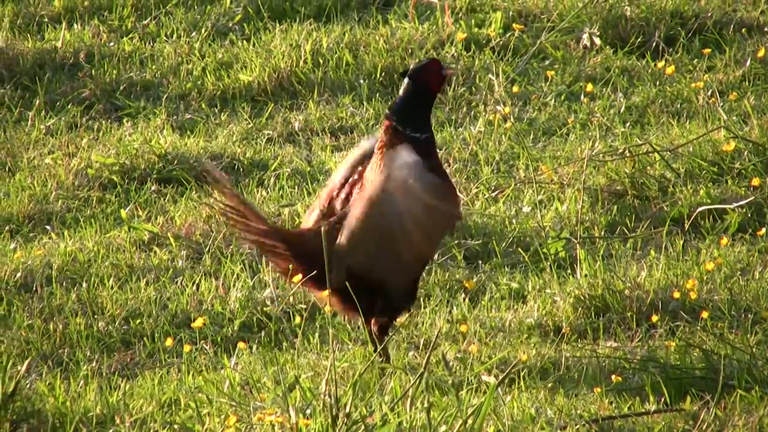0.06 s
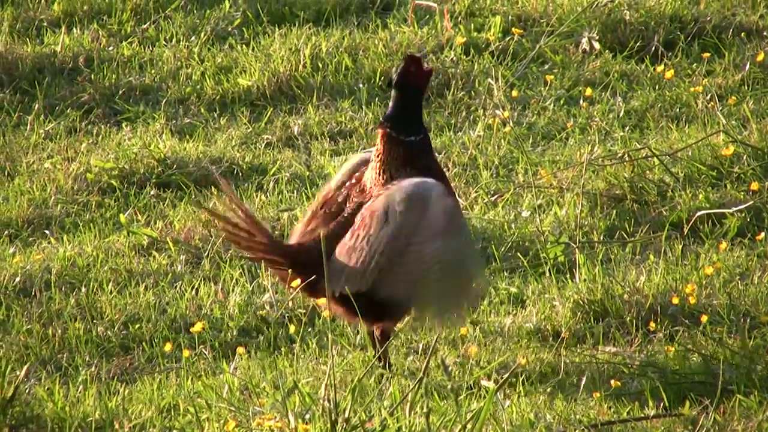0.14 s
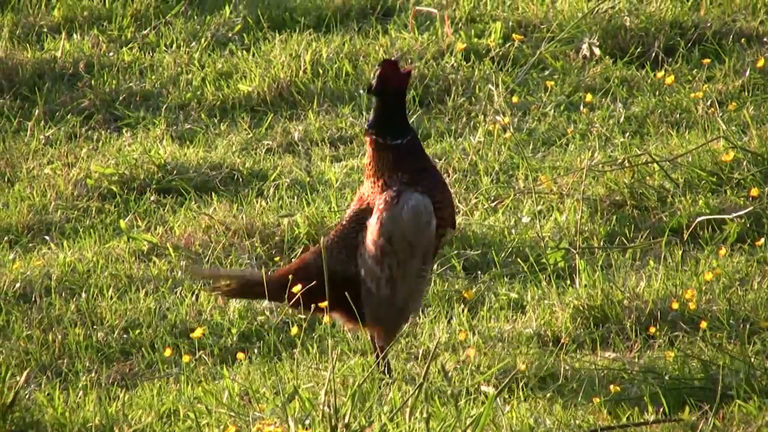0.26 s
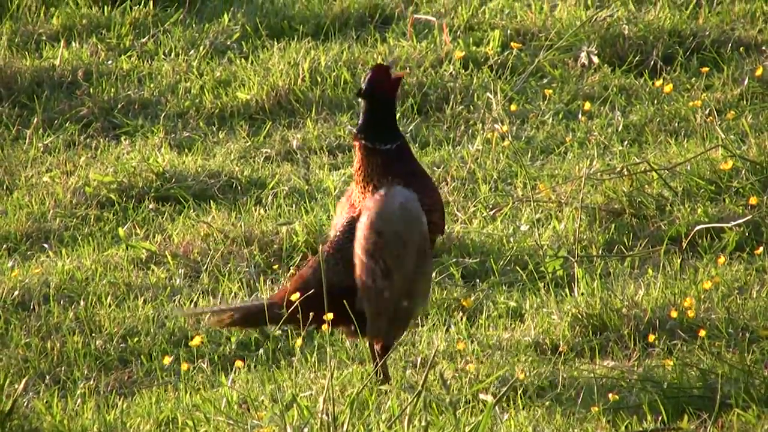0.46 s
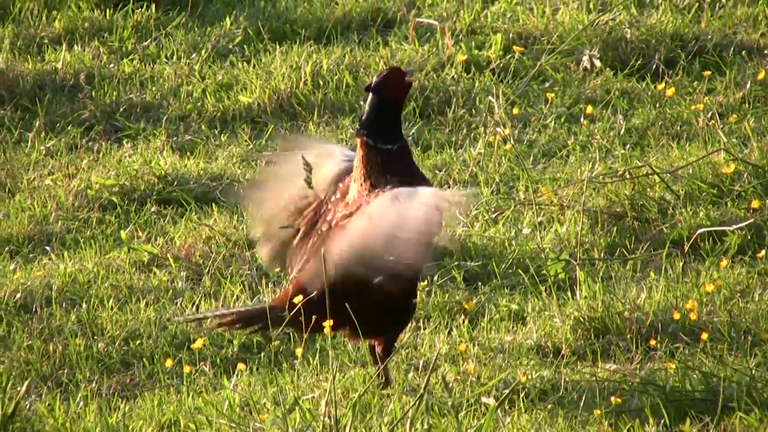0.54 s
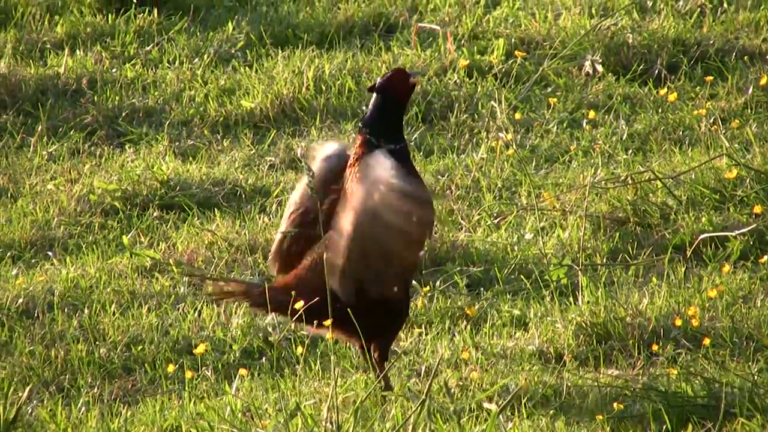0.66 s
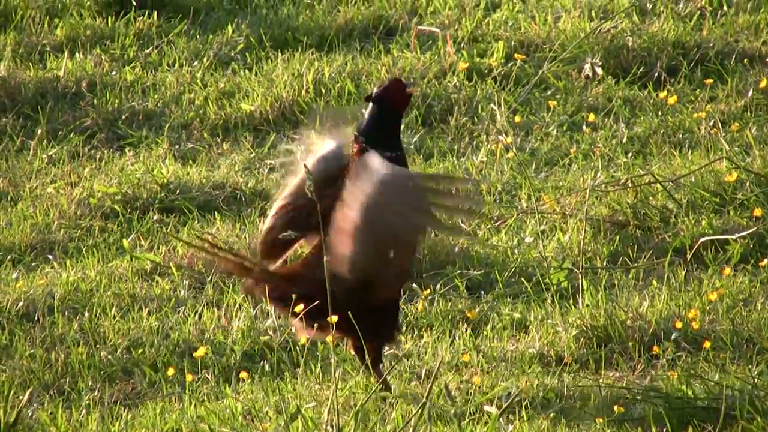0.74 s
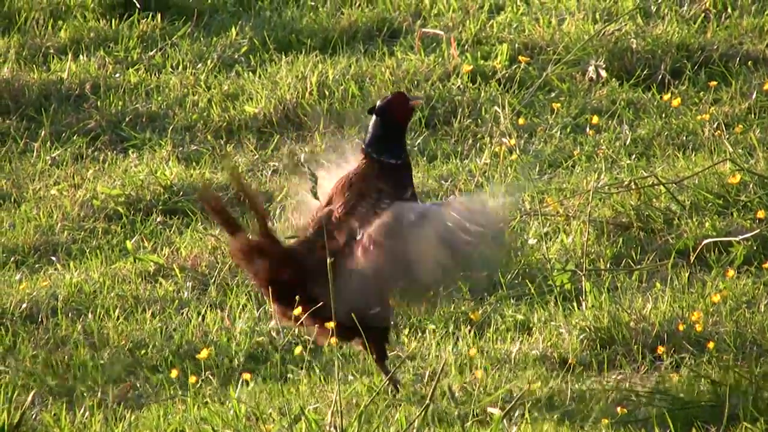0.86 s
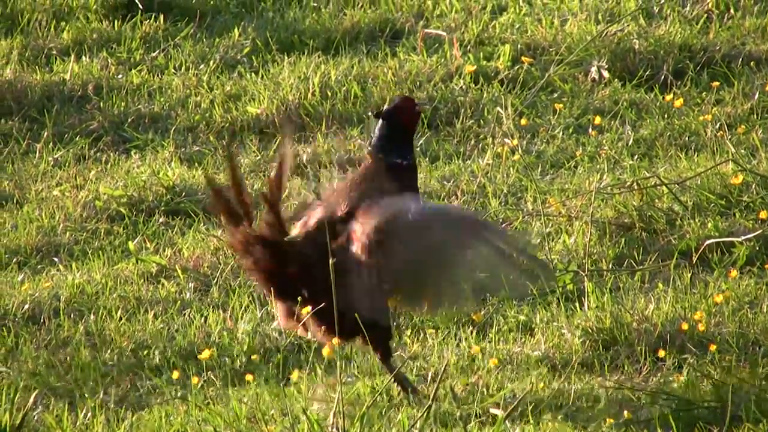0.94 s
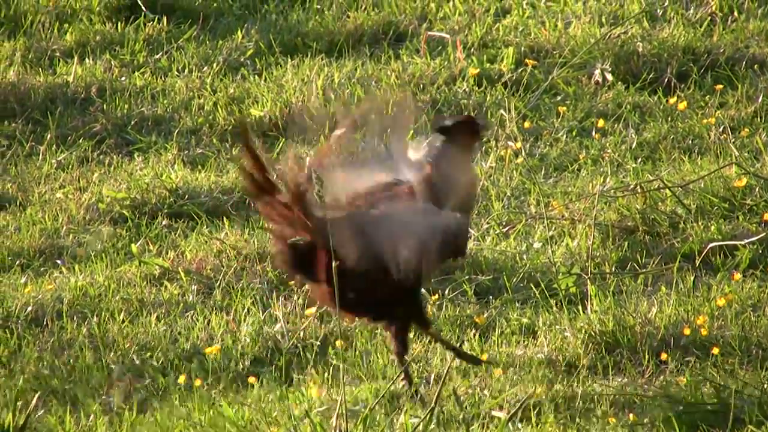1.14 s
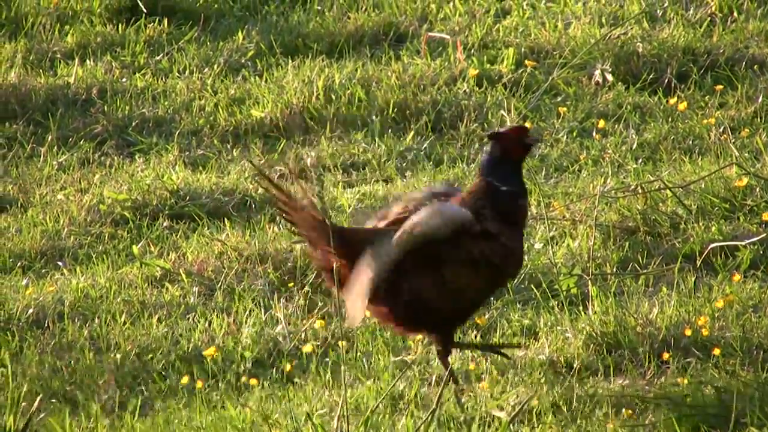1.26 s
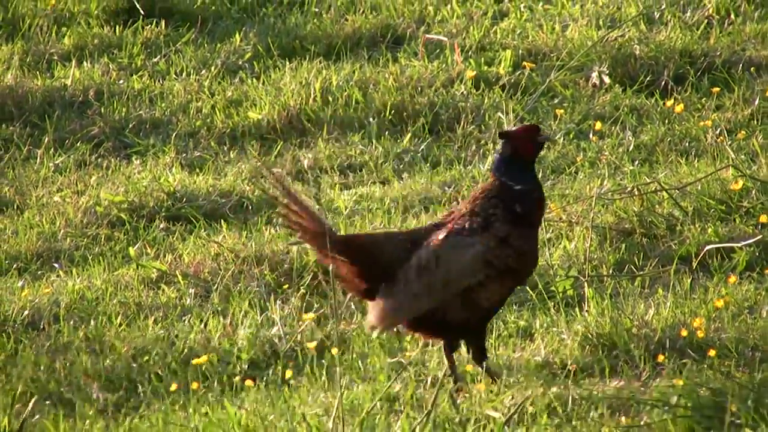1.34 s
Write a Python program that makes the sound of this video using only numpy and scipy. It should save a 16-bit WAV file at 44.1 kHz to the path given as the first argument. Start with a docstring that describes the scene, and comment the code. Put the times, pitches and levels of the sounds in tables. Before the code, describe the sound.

A pheasant crows loudly in an open meadow. After one soft wingbeat at 0.1 seconds come two harsh, rasping syllables, from 0.2 to 0.45 and from 0.5 to 0.75 seconds, with a short echo. From 0.8 to 1.3 seconds its wings drum about seven quick, quieter beats, swishing and thumping with small feather snaps. A faint distant rumble and barely audible insects lie underneath.

```python
"""One soft wingbeat, then a cock pheasant crows two harsh syllables and drums a quick burst with its wings.
The voice is a whistle that breaks into chaotic pulses ringing the windpipe; grass scatters it and the
meadow's edge throws it back. The wings swish, thump and snap their feathers.
Far rumble, insects and a thin distant bird note lie underneath."""
import sys
import numpy as np
from scipy import signal
from scipy.fft import rfft, irfft
from scipy.io import wavfile
from scipy.ndimage import uniform_filter1d

SR = 44100
rng = np.random.default_rng(int(sys.argv[2]) if len(sys.argv) > 2 else 0)


def unload_wav(signal):
    """Save mono or channel-first audio to the path in sys.argv[1] as 16-bit WAV at rate SR, clipped to [-1, 1]."""
    wavfile.write(
        sys.argv[1],
        SR,
        np.round(np.clip(np.atleast_2d(signal).T, -1, 1) * 32767).astype(np.int16),
    )


N = 61739
TIME_S = np.arange(N) / SR

# per syllable: t/s, pitch/Hz, tone/dB, low rasp/dB, high rasp/dB, main resonance/Hz, its level/dB
SYLLABLES = [
    [(0.218, 1076, -52, -52, -68, 4090, -59), (0.224, 1069, -35, -35, -51, 3880, -47),
     (0.23, 1116, -25.5, -31, -29.5, 4030, -27), (0.248, 1193, -21.5, -30, -23, 4060, -24.5),
     (0.252, 1163, -20.5, -21, -21, 4090, -23), (0.282, 1167, -19.5, -26, -22, 4072, -24.5),
     (0.3, 1217, -19, -25, -19, 4050, -24), (0.346, 1160, -17.5, -27.5, -23, 4072, -26),
     (0.414, 1132, -16.5, -26, -26.5, 4022, -31.5), (0.436, 1120, -17, -67, -39, 3924, -35),
     (0.448, 1236, -51, -52, -23, 4090, -40)],
    [(0.512, 1161, -62, -46, -46, 4220, -40), (0.524, 1119, -17, -30.5, -30, 4126, -33.5),
     (0.542, 1127, -11, -22.5, -22, 4040, -28), (0.552, 1136, -16, -24, -24, 4117, -33),
     (0.562, 1327, -24.5, -38.5, -23.5, 4140, -25.5), (0.588, 1183, -19.5, -30.5, -24.5, 4154, -35),
     (0.602, 1151, -18.5, -32.5, -30, 4076, -36.5), (0.636, 1126, -16.5, -35.5, -33, 4007, -35),
     (0.684, 1091, -21, -42, -41.5, 4184, -44), (0.72, 1095, -34, -49, -55, 4190, -43),
     (0.745, 1127, -62, -57, -55, 4310, -50)],
]
# chaotic shares: t/s, of the tone/0-1, of the pulses/0-1
CHAOS = [(.22, 0.77, 0.98), (.335, 0.77, 1), (.355, 0.6, 0.82), (0.399, 0.14, 0.94), (0.419, 0, 1),
         (.52, 0, 0.67), (0.548, 0.02, 0.5), (.56, 0.98, 0.3), (0.581, 0.3, 0.8), (0.599, 0, 0.9),
         (.64, 0.01, 0.63), (.74, 0, 1)]
def syllable(rows, ramp_s=0.004, hiss_rise_s=0.074, pipe_rest_hz=4090):
    """A whistle breaks into pulses, uneven or steady at a third of its pitch, that ring the windpipe."""
    start_s, end_s = rows[0][0], rows[-1][0]
    hz, tone_db, low_db, high_db, pipe_hz, pipe_db = tracks(rows)
    tone_chaos, pulse_chaos = tracks(CHAOS)
    phase = 2 * np.pi * np.cumsum(hz) / SR
    whistle = np.sin(phase) + amp(-30.5) * np.sin(2 * phase) - amp(-22) * np.sin(3 * phase)
    whistle *= np.sqrt(2) * (1 + 0.05 * drift(150))
    cycles = np.cumsum(hz * np.abs(1 + 0.6 * drift(30))) / SR
    uneven = np.diff(np.floor(cycles), prepend=0)  # one pulse per jittered cycle
    uneven = unit_rms(uneven * amp(0.5 * rng.standard_normal(N)))
    steady = unit_rms(sum(np.cos(k * phase / 3) for k in range(2, 30)))
    pulses = np.sqrt(pulse_chaos) * uneven + np.sqrt(1 - pulse_chaos) * steady
    rough = levelled(resonate(uneven, hz, width_hz=150), 350)
    tone = np.sqrt(1 - tone_chaos) * whistle + np.sqrt(tone_chaos) * rough
    low, high, hiss = (windpipe(modes, pulses, pipe_hz / pipe_rest_hz)
                       for modes in (LOW_MODES, HIGH_MODES, HISS_MODES))
    high += hiss * np.clip((TIME_S - start_s) / hiss_rise_s, 0, 1)
    rasp = amp(low_db) * levelled(low, 600) + amp(high_db) * levelled(high, 600)
    ring = levelled(resonate(uneven, pipe_hz, width_hz=45), 400)
    gate = np.clip(np.minimum(TIME_S - start_s, end_s - TIME_S) / ramp_s, 0, 1)
    return gate * (amp(tone_db) * tone + amp(pipe_db) * ring + rasp)


# windpipe resonances at rest: f/Hz, width/Hz, relative level/dB
LOW_MODES = [(760, 41, -6), (1477, 290, 0.5), (1910, 290, 7.5), (2135, 410, -4.5), (2480, 300, -24)]
HIGH_MODES = [(2856, 420, -12.5), (3346, 260, -11.5), (3754, 167, -1), (4450, 300, -15), (4880, 207, -6),
              (5460, 360, -6), (6390, 450, -14), (6970, 360, -8), (7840, 870, -18)]
HISS_MODES = [(9740, 1660, -17), (12300, 1500, -31)]
def windpipe(modes, pulses, tuning, wander=0.013):
    """Pulses ring a row of resonances, each wavering as the neck works."""
    out = 0
    for k, (hz, width_hz, db) in enumerate(modes):
        waver = 1 + wander * unit_rms(uniform_filter1d(drift(700), 700))
        ring = resonate(pulses, hz * tuning * waver, width_hz)
        out += (-1) ** k * amp(db) * levelled(ring, 400, share=0.2)
    return out


# ring as the beak closes: t/s, f/Hz, level/dB
BEAK_RING = [(0.69, 3724, -53), (0.712, 3650, -33.5), (0.746, 3550, -51), (0.76, 3780, -49)]
# undertone and other half of the voice box, per syllable: t/s, f/Hz, level/dB
UNDERTONE = [
    [(0.222, 937.6, -41), (0.266, 864, -33), (0.338, 890, -41), (0.348, 863, -43), (0.376, 964, -42),
     (0.43, 920, -35)],
    [(0.525, 970, -64), (0.527, 985, -52), (0.539, 1000, -37), (0.589, 871.9, -36.5), (0.63, 940, -54)],
]
UPPER_VOICE = [
    [(0.222, 2760, -56), (0.23, 2800, -35), (0.268, 2853, -31), (0.344, 2865, -31), (0.35, 3030, -30.5),
     (0.418, 2954, -38), (0.44, 3030, -50)],
    [(0.52, 3024, -38), (0.526, 2987, -37), (0.546, 3058, -29), (0.566, 2828, -30), (0.588, 2937, -28),
     (0.62, 3286, -48)],
]
def crow(limit_over_rms=2.4):
    """Both syllables with their side tones, soft-limited: the membranes can swing only so far."""
    voice = sum(syllable(rows) for rows in SYLLABLES) + wavering_tone(BEAK_RING, width_hz=40)
    voice += sum(wavering_tone(rows, width_hz=50) for rows in UNDERTONE)
    voice += wavering_tone(UPPER_VOICE[0], width_hz=110, octave_db=-9)
    voice += wavering_tone(UPPER_VOICE[1], width_hz=25, octave_db=-4)
    swing = limit_over_rms * np.sqrt(uniform_filter1d(voice ** 2, 1500) + 1e-10)
    return swing * np.tanh(voice / swing)


# downstrokes: t/s, swish/dB, thump/dB, push f/Hz
DOWNSTROKES = [(0.083, -45, -50.5, 108.5), (0.818, -44.5, -38, 148), (0.884, -36.5, -35.5, 119),
               (0.954, -33.5, -32, 128), (1.028, -35.5, -33, 96), (1.1, -35.5, -31.5, 129),
               (1.169, -37, -34, 130), (1.236, -39, -38, 115)]
# wing noise spectra: f/Hz, relative level/dB
SWISH_SPECTRUM = [(260, -17), (450, -1), (1460, -1.5), (2320, -13), (2840, -11), (4430, -19), (5040, -22),
                  (9490, -21.5), (14000, -44)]
THUMP_SPECTRUM = [(18, -46), (30, -18), (83, -4), (135, 0.5), (194, -2), (256, -4.5), (536, -22),
                  (600, -37), (780, -48), (1320, -120)]
def wings(rise_s=0.0028, fall_s=0.0086, up_lead_s=0.0328, wing_lag_s=0.013, thump_s=0.02):
    """A weak upstroke, then the downstroke: a feathery swish from each wing and a low push of air."""
    swish = thump = push = 0
    for at_s, swish_db, thump_db, hz in DOWNSTROKES:
        for lag_s, db in ((0, 0), (wing_lag_s, -4), (-up_lead_s, -8.5)):
            age = TIME_S - at_s - lag_s
            swish += amp(swish_db + db) * np.exp(np.where(age < 0, age / rise_s, -age / fall_s))
        age = TIME_S - at_s - 0.012  # thump trails swish
        thump += amp(thump_db) * (bump(age / thump_s) + amp(-4) * bump((age + up_lead_s) / thump_s))
        push -= amp(thump_db + 7.5) * bump(age * hz / 0.99) * np.cos(2 * np.pi * hz * age)
    side = 0.088 * swish * noise(SWISH_SPECTRUM)
    low = thump * levelled(noise(THUMP_SPECTRUM), 900, share=0.8)
    feathers = swish * levelled(noise(SWISH_SPECTRUM), 200)
    return panned(feathers + low + push, left_db=1) + [side, -side]


# feather snaps: t/s, level/dB, f/Hz
FEATHER_SNAPS = [(.919, -44, 5030), (0.9853, -33.5, 8660), (1.058, -32, 2900), (1.169, -39, 2400),
                 (1.281, -43, 3500)]
def feather_snaps(decay_s=0.0012):
    """Stiff feathers flick past each other."""
    out = 0
    for at_s, db, hz in FEATHER_SNAPS:
        age = np.maximum(TIME_S - at_s, 0)
        burst = noise([(hz / 5, -14), (hz / 2.5, -3), (hz, 0), (hz * 1.6, -12), (20000, -40)])
        out += amp(db) * (age > 0) * np.exp(-age / decay_s) * burst
    return out


# left-right scatter: f/Hz, level/dB
GRASS_SPECTRUM = [(500, -19), (1200, -27), (2400, -45), (4400, -9.5), (8000, -10.5), (14000, 0)]
def grass_scatter(x, decay_s=0.018, length=1500):
    """Grass and ground scatter sound unequally to left and right, most in the treble."""
    taps = noise(GRASS_SPECTRUM)[:length] * np.exp(-TIME_S[:length] / decay_s)
    gains = amp(curve(GRASS_SPECTRUM, np.fft.rfftfreq(length, 1 / SR)))
    taps *= np.sqrt(np.mean(gains ** 2)) / np.linalg.norm(taps)
    side = signal.fftconvolve(x, taps)[:N]
    return np.array([side, -side])


# single echoes: delay/s, left/dB, right/dB
EDGE_ECHOES = [(.045, -20.5, -18.5), (.012, -30, -32), (0.018, -19, -30), (0.068, -29, -30.5),
               (.11, -29.5, -25)]
# tail decay: f/Hz, T60/s
TAIL_T60 = [(500, 0.36), (1200, 0.54), (2500, .7), (4000, 0.84), (10000, 0.53)]
# hedge return: f/Hz, relative level/dB
HEDGE_SPECTRUM = [(500, -1), (1150, -4.5), (2500, 0.5), (5000, 1), (10000, 0.5)]
def field_echo(x, crossfeed=0.6):
    """The field edge returns single echoes and a diffuse tail, each band dying at its own rate."""
    taps = np.zeros((2, SR))
    slots = np.arange(400, SR - 20, 20)
    arrivals = slots + rng.integers(0, 20, (2, len(slots)))
    np.put_along_axis(taps, arrivals, rng.choice([-1., 1.], arrivals.shape), 1)
    hz, t, bands = signal.stft(taps, SR, nperseg=256)
    bands *= amp(curve(HEDGE_SPECTRUM, hz)[:, None] - 60 * t / curve(TAIL_T60, hz)[:, None])
    tail = signal.istft(bands, SR, nperseg=256)[1]
    tail = amp(-14) * (tail + crossfeed * tail[::-1]) / np.linalg.norm(tail[0])
    for delay_s, left_db, right_db in EDGE_ECHOES:
        tail[:, round(delay_s * SR)] += amp([left_db, right_db])
    return signal.fftconvolve(x[None], tail, axes=1)[:, :N]


# far rumble and hiss: f/Hz, relative level/dB
RUMBLE_SPECTRUM = [(21, -25), (35, 0.5), (73, -2.5), (249, -7), (306, -2), (460, -7), (624, -4), (709, -4),
                   (987, -7), (1480, -14), (2740, -23), (3810, -28.5), (4120, -26), (5730, -29.5),
                   (8410, -28), (15500, -34)]
# f/Hz, left-right correlation
RUMBLE_CORRELATION = [(60, 1), (180, 0.3), (550, 0.86), (1650, 0.85), (4970, 0.44), (15000, -0.7)]
# f/Hz, left minus right/dB
RUMBLE_BALANCE = [(60, 1.3), (240, 1.0), (950, 1.5), (3770, -1.6), (15000, -0.72)]
def far_rumble(level_db=-40.5, patch_db=1.4):
    """Distant rumble and hiss, drifting in patches over time and frequency."""
    hz = np.fft.rfftfreq(1024, 1 / SR)[:, None]
    draws = rng.standard_normal((N // 256 + 5, len(hz), 5)).T
    left, independent = draws[0] + 1j * draws[1], draws[2] + 1j * draws[3]
    patches = unit_rms(uniform_filter1d(uniform_filter1d(draws[4], 10, 0), 10, 1))
    shared, lean = curve(RUMBLE_CORRELATION, hz), amp(curve(RUMBLE_BALANCE, hz) / 2)
    right = shared * left + np.sqrt(1 - shared ** 2) * independent
    bands = np.array([left * lean, right / lean]) * amp(curve(RUMBLE_SPECTRUM, hz) + patch_db * patches)
    return amp(level_db) * unit_rms(signal.istft(bands, nperseg=1024, noverlap=768)[1][:, :N])


def insects(hz=8430, width_hz=450, level_db=-64):
    """A narrow band of high hiss, independent on each side."""
    sides = [unit_rms(resonate(rng.standard_normal(N), hz, width_hz)) for _ in range(2)]
    return amp(level_db) * np.array(sides)


# distant bird note: t/s, f/Hz, level/dB
BIRD_NOTE = [(1.13, 7212, -60), (1.148, 7412, -63), (1.162, 7340, -56.5), (1.304, 7229, -62),
             (1.314, 7350, -73), (1.32, 7190, -72)]
def far_bird():
    """One thin, wavering whistle."""
    return panned(wavering_tone(BIRD_NOTE, width_hz=120), left_db=2)


def wavering_tone(rows, width_hz, octave_db=-100):
    """Narrow-band noise and its octave along rows of t/s, f/Hz, level/dB."""
    times, pitches, db = np.transpose(rows)
    hz, breath = np.interp(TIME_S, times, pitches), rng.standard_normal(N)
    tone, octave = (levelled(resonate(breath, k * hz, k * width_hz), 500) for k in (1, 2))
    return amp(np.interp(TIME_S, times, db, -120, -120)) * (tone + amp(octave_db) * octave)


def resonate(x, hz, width_hz):
    """Gliding resonance: shift hz to zero, smooth twice, shift back."""
    carrier = np.exp(2j * np.pi * np.cumsum(hz * np.ones(len(x))) / SR)
    pole = np.exp(-np.pi * width_hz / SR)
    return 2 * (carrier * signal.lfilter([(1 - pole) ** 2], [1, -2 * pole, pole ** 2], x / carrier)).real


def levelled(x, samples, share=0.89):
    """Evens out a share of the level swings; unit RMS."""
    power = uniform_filter1d(unit_rms(x) ** 2, samples) + 1e-3
    return unit_rms(x / power ** (share / 2))


def noise(spectrum):
    return unit_rms(filtered(rng.standard_normal(N), spectrum))


def filtered(x, spectrum):
    return irfft(rfft(x) * amp(curve(spectrum, np.fft.rfftfreq(N, 1 / SR))), N)


def drift(samples):
    return unit_rms(uniform_filter1d(rng.standard_normal(N), samples))


def tracks(rows):
    times, *columns = np.transpose(rows)
    return [np.interp(TIME_S, times, column) for column in columns]


def curve(points, hz):
    knots_hz, values = np.transpose(points)
    return np.interp(np.log(hz + 1), np.log(knots_hz + 1), values)


def bump(x):
    return np.exp(-x ** 2)


def panned(x, left_db):
    return x * amp([[left_db / 2], [-left_db / 2]])


def unit_rms(x):
    return x / np.sqrt(np.mean(x ** 2) + 1e-20)


def amp(db):
    return 10 ** (np.asarray(db) / 20)


def scene():
    """The crow with its reflections, the wings and the meadow, in stereo."""
    voice = crow()
    call = panned(voice, left_db=-0.24) + grass_scatter(voice) + field_echo(voice)
    return call + wings() + feather_snaps() + far_rumble() + insects() + far_bird()


# overall tone shape: f/Hz, gain/dB
TONE_SHAPE = [(20, -26), (40, 0), (11000, 0.5), (12500, -4.5), (15500, -18)]
def record(dry, cutoff_hz=15700):
    """Deepest rumble and highest treble rolled off."""
    lowpass = signal.firwin(511, cutoff_hz, window=("kaiser", 9), fs=SR)
    return signal.oaconvolve(filtered(dry, TONE_SHAPE), lowpass[None], "same")


dry = scene()
out = record(dry)
unload_wav(out)
```